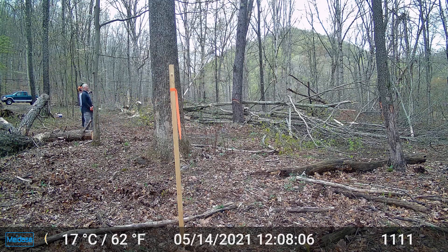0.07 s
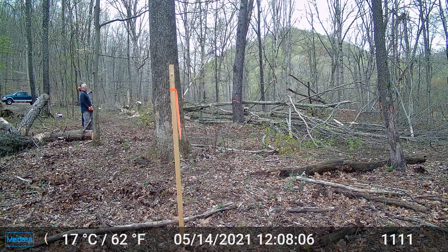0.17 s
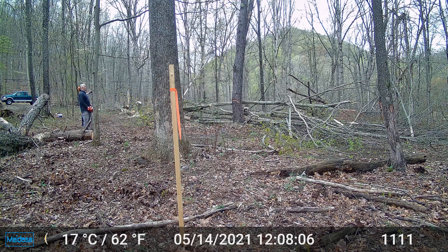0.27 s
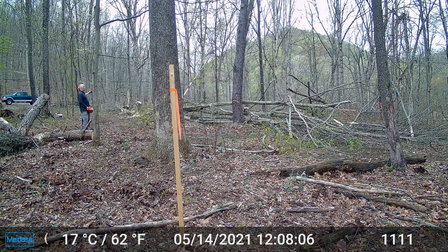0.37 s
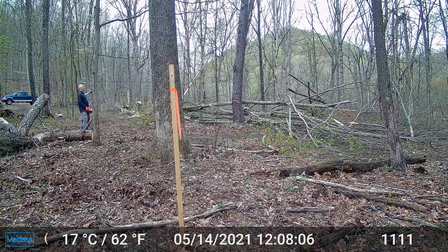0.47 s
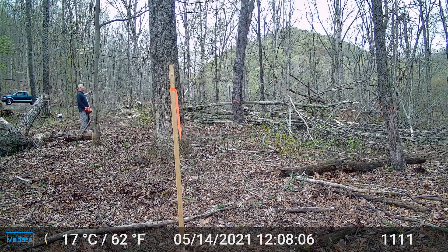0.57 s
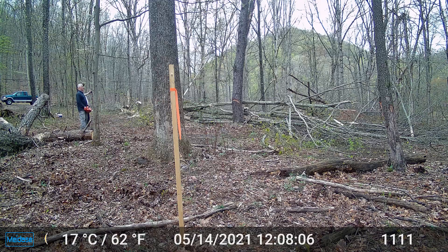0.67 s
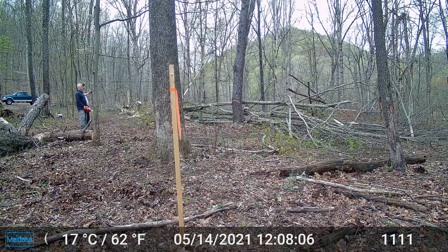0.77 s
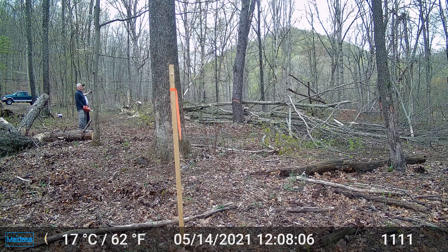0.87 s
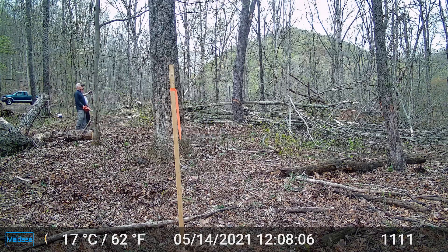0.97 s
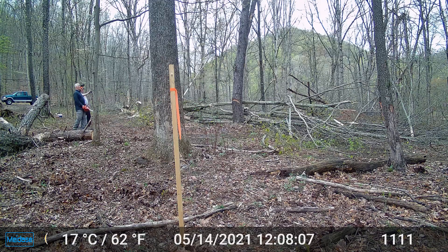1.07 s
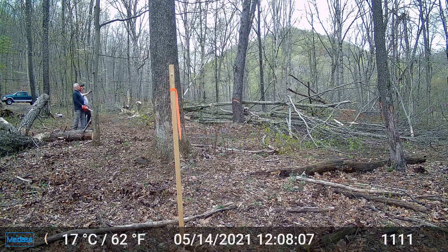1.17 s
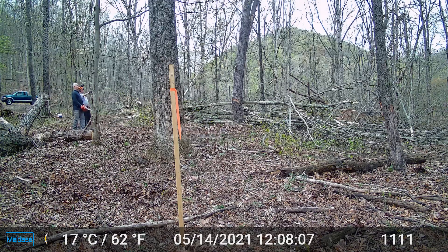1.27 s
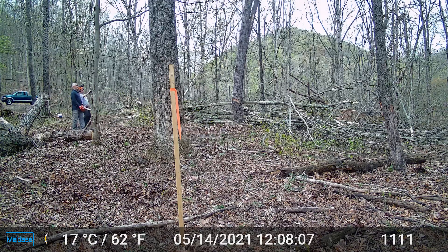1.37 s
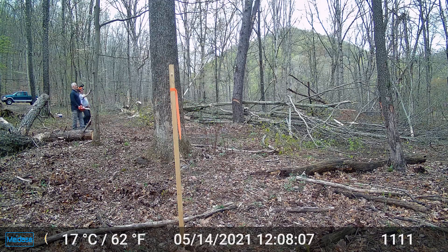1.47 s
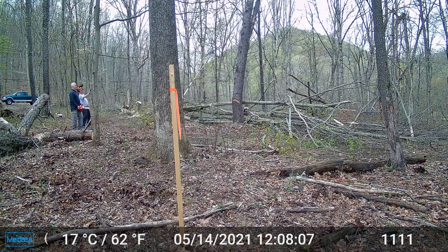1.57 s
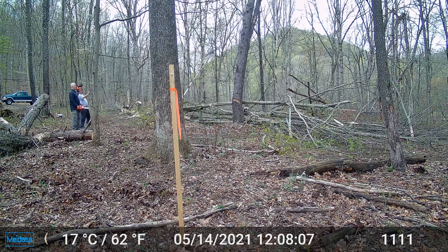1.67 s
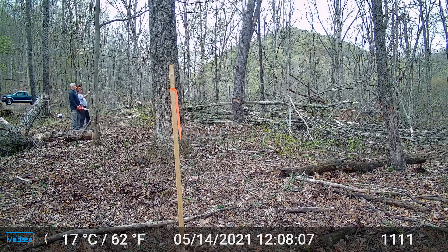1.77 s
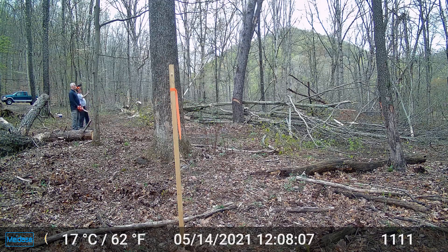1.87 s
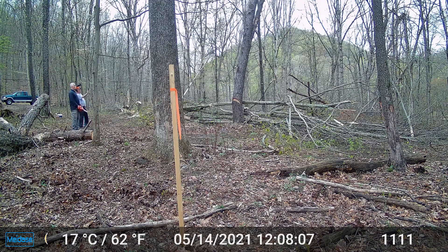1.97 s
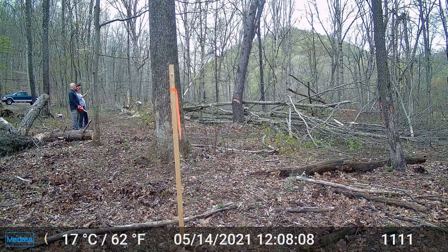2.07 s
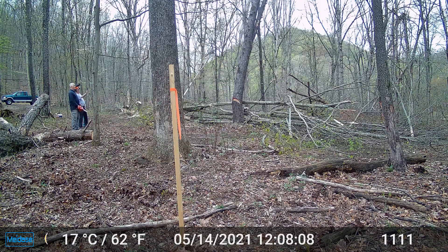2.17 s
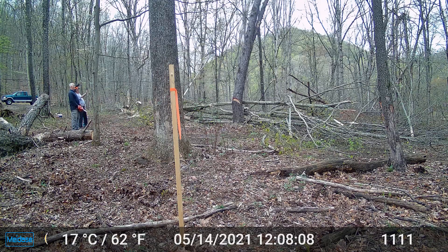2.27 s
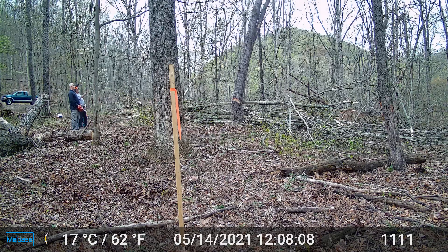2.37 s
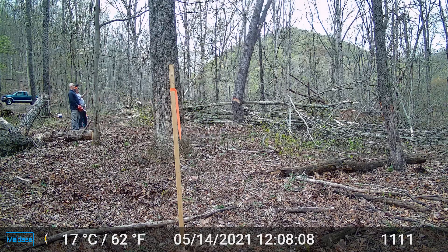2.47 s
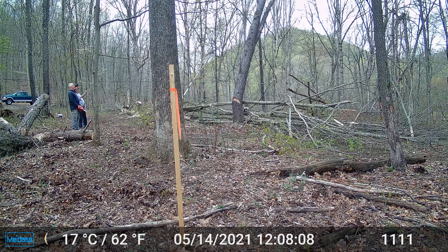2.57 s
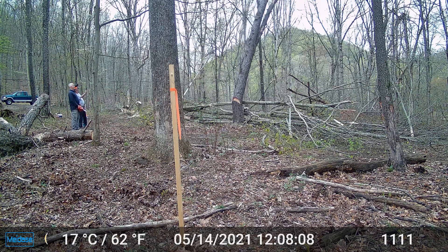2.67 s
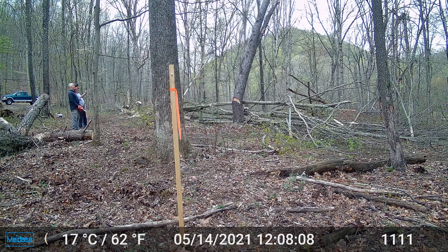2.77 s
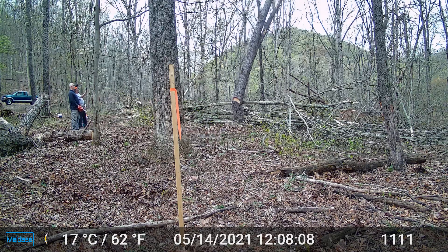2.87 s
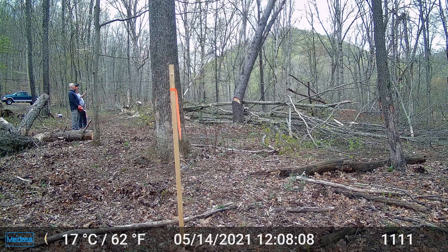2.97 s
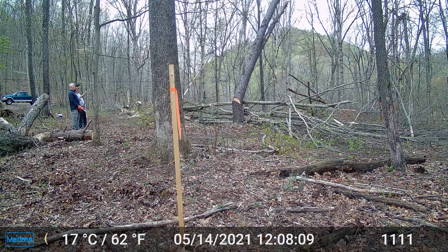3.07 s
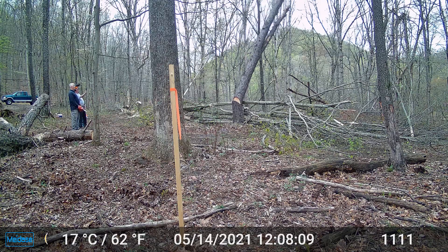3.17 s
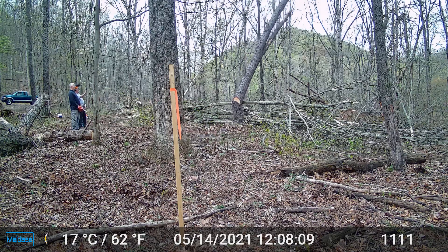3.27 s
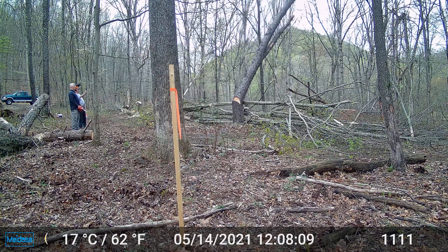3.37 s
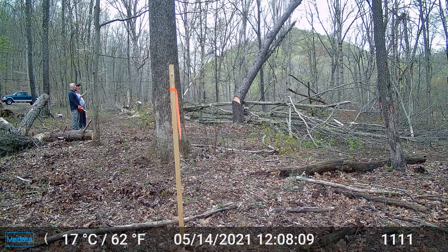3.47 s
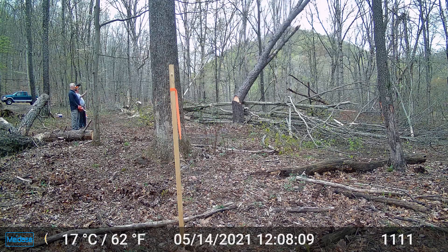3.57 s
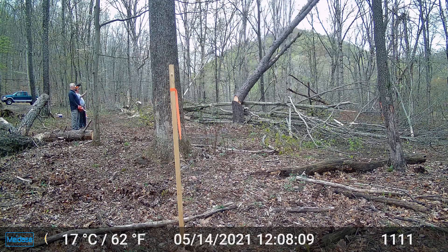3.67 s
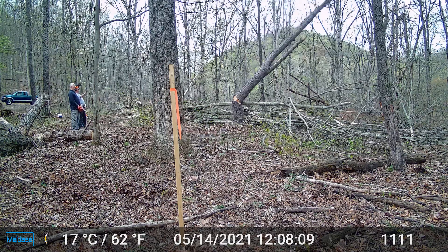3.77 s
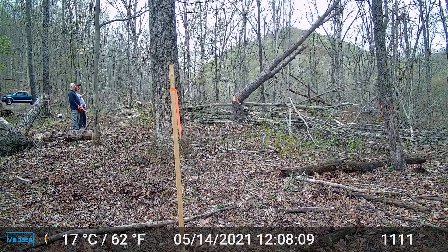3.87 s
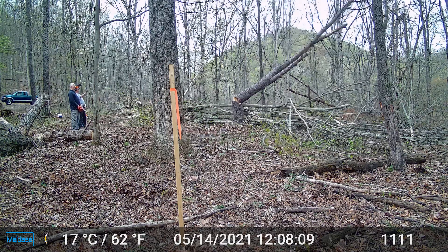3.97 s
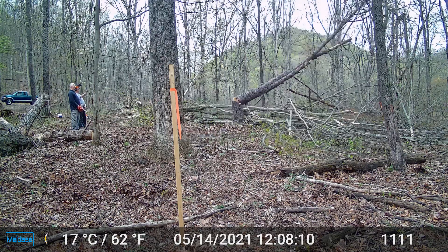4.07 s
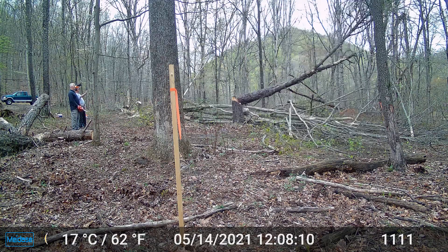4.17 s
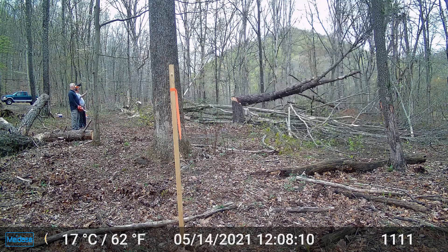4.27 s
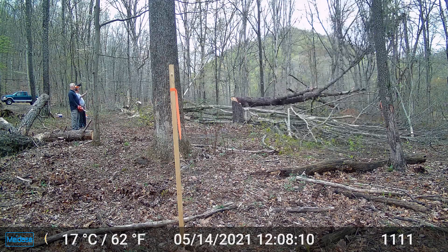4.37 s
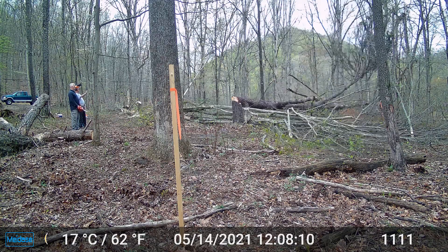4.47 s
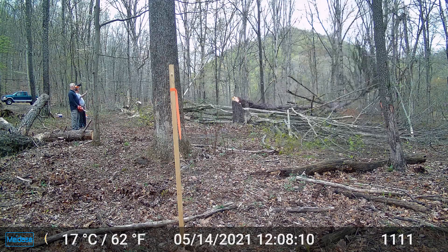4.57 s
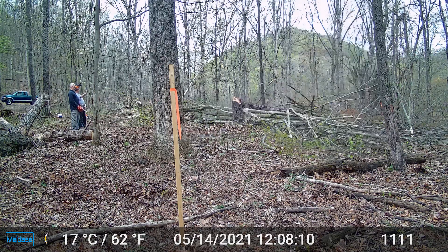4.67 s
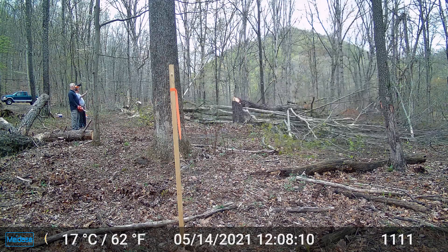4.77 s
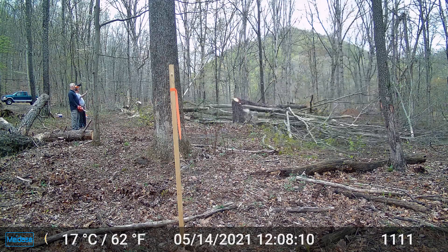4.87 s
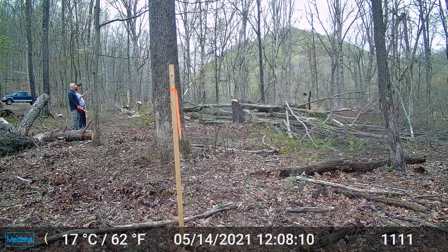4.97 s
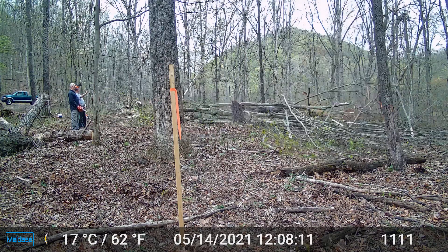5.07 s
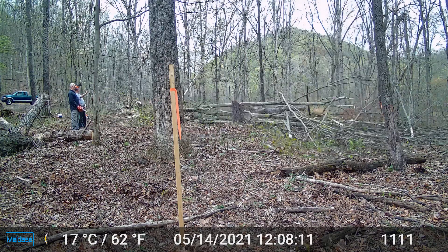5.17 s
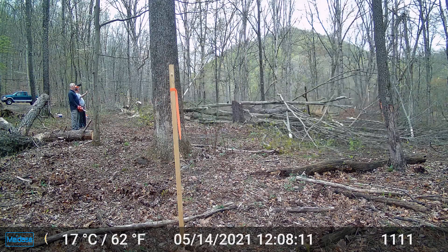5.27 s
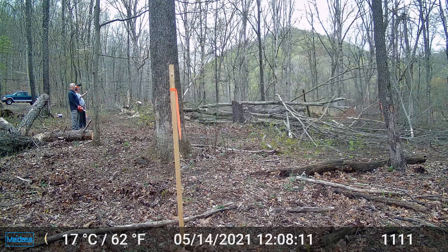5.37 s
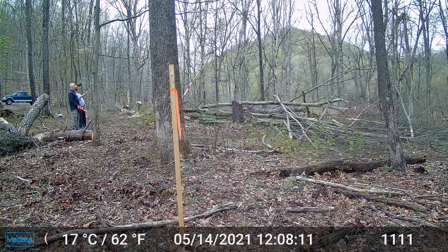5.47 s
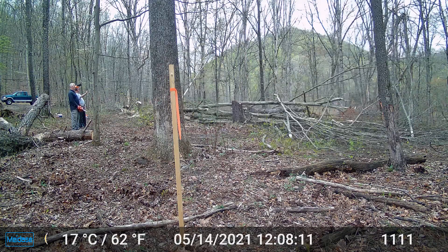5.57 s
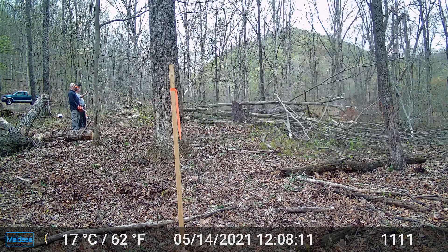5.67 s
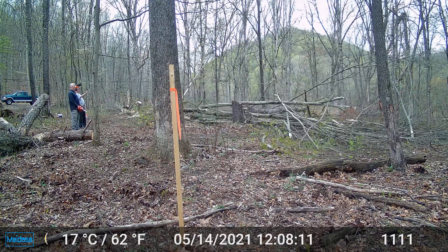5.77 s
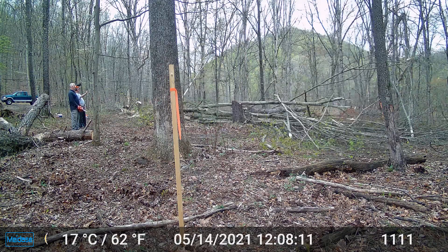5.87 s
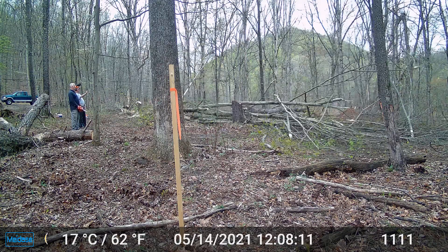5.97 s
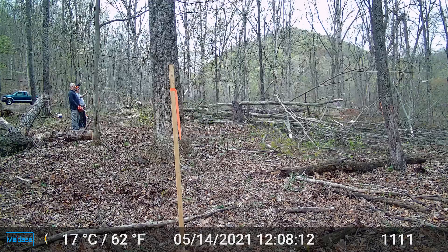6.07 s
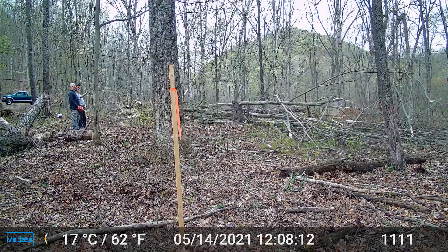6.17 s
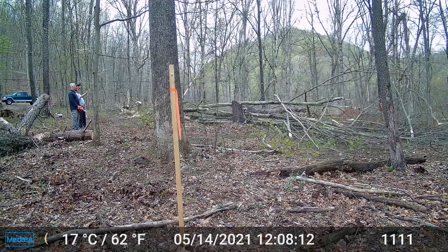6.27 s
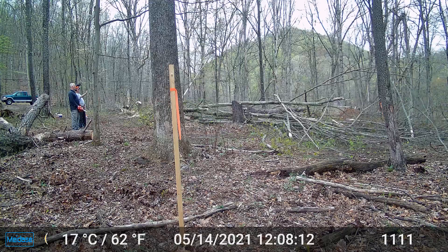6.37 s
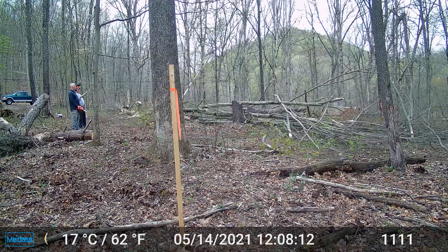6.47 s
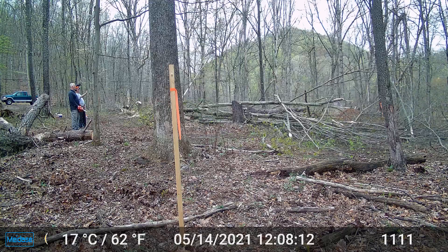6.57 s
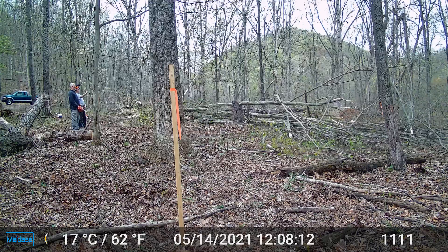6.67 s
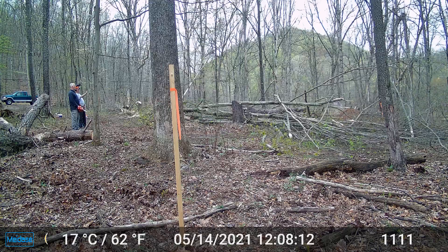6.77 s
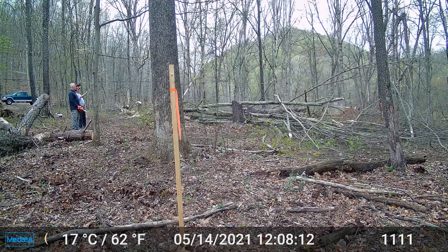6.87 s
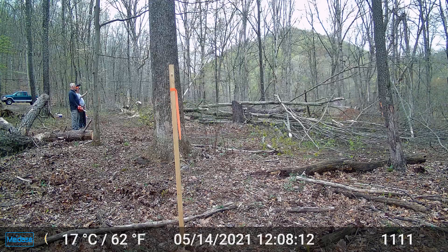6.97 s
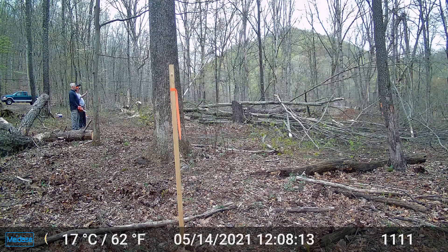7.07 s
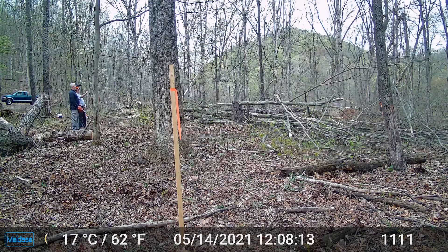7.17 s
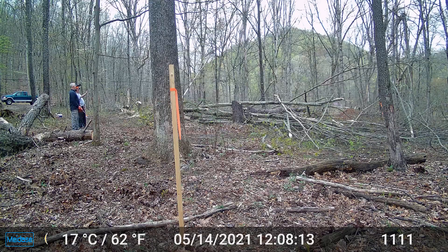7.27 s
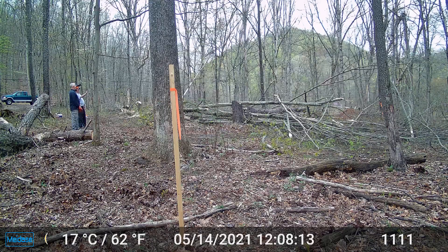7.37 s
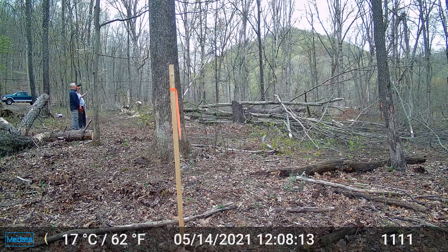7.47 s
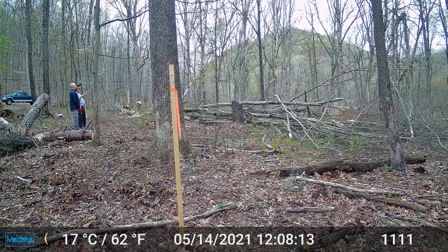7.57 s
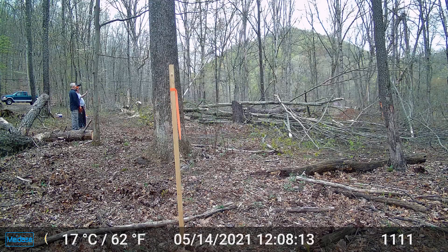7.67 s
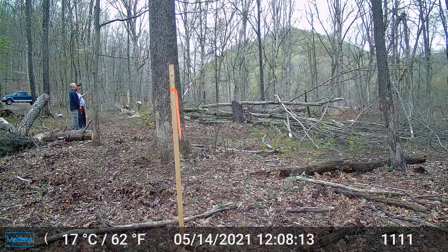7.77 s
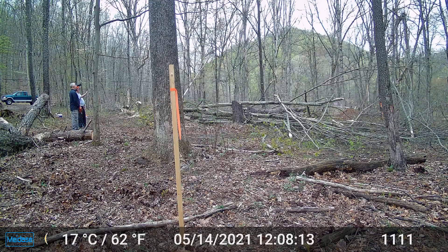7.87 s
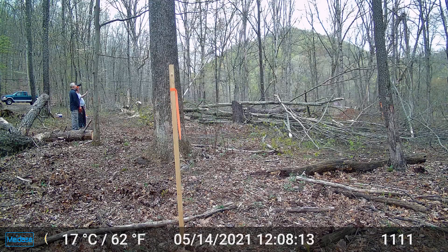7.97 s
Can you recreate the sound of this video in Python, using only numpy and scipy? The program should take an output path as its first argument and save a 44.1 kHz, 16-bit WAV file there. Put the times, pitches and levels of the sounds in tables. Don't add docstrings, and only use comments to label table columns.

```python
import sys
import numpy as np
from scipy import signal
from scipy.fft import rfft, irfft, next_fast_len
from scipy.io import wavfile
from scipy.ndimage import uniform_filter1d, map_coordinates

SR = 44100
rng = np.random.default_rng(int(sys.argv[2]) if len(sys.argv) > 2 else 0)


def magnitude_from_level(level_db):
    exponent = np.asarray(level_db, float) / 20
    return 10 ** exponent


def int16_out(signal):
    q = np.round(np.clip(np.atleast_2d(signal).T, -1, 1) * 32767)
    wavfile.write(sys.argv[1], SR, q.astype(np.int16))


N = 352932
PARTS_S, LANDS_S = 3.4, 4.8
RAKE_START_S, RAKE_END_S = 3.837, 4.6
KNOCK_CYCLES, KNOCK_DB = 0.66, 4.5


def unit(x):
    return x / np.sqrt(np.mean(x ** 2, axis=-1, keepdims=True) + 1e-20)


def peak(rows, db):
    return magnitude_from_level(db) * rows / np.abs(rows).max(1, keepdims=True)


def along(points, hz):
    f, v = np.transpose(points)
    return np.interp(np.log(hz + 1), np.log(f + 1), v)


def curves(rows):
    s, *columns = np.transpose(rows)
    t = np.arange(N) / SR
    return [np.interp(t, s, column, left=-120, right=-120) for column in columns]


def modes(rows, f):
    return sum((-1) ** k * magnitude_from_level(db) * 1j * f * width / (hz * hz - f * f + 1j * f * width)
               for k, (hz, width, db) in enumerate(rows))


def causal(gain):
    cepstrum = irfft(np.log(np.maximum(gain, 1e-6)))
    half = cepstrum.shape[-1] // 2
    cepstrum[..., 1:half] *= 2
    cepstrum[..., half + 1:] = 0
    return np.exp(rfft(cepstrum))


def filtered(x, response):
    size = next_fast_len(x.shape[-1] + 8192)
    return irfft(rfft(x, size) * response(np.fft.rfftfreq(size, 1 / SR)), size)[..., :x.shape[-1]]


def wobble(rate):
    knots = rng.standard_normal(int(N * rate / SR) + 4)
    return map_coordinates(knots, [np.arange(N) * rate / SR], order=2)


def crackle(spectrum, per_s, spread_db, life_ms, noise_share, count=5):
    sizes = magnitude_from_level(spread_db * np.minimum(rng.exponential(size=(count, N)), 3))
    starts = sizes * (rng.random((count, N)) < per_s / SR)
    grains = unit(signal.lfilter([1], [1, -np.exp(-1000 / (SR * life_ms))], starts))
    bed = np.clip(noise_share, 0, 1)
    patches = magnitude_from_level(2.4 * np.array([wobble(24) for _ in range(count)]))
    mix = patches * np.sqrt((1 - bed) * grains ** 2 + bed) * rng.standard_normal((count, N))
    centres = np.geomspace(250, 7500, count)[:, None]

    def pitch_ranges(f):
        return np.exp(-(np.log((f + 1) / centres) / (2.7 / (count - 1))) ** 2)

    return unit(filtered(mix, lambda f: magnitude_from_level(along(spectrum, f)) * pitch_ranges(f)).sum(0))


def placed(rows, seconds, count):
    at = np.round(seconds * SR).astype(int)[:, None] + np.arange(rows.shape[1])
    track = (np.arange(len(rows)) % count)[:, None] * 2 * N
    return np.bincount((at + track).ravel(), rows.ravel(), count * 2 * N).reshape(count, -1)[:, :N]


def floor_path(x):
    share = 0.6
    return (x + share * np.roll(x, round(0.0006 * SR), -1)) / np.hypot(1, share)


def knock(hz, t, cycles):
    u = t * hz / cycles
    blow = np.sin(2 * np.pi * hz * t) * u ** 2 * np.exp(-u)
    return blow + magnitude_from_level(-6.5) * np.roll(blow, round(0.002548 * SR), 1)


# frequency in Hz, t60 in seconds.
WOODS_DECAY = [(80, 0.75), (300, 0.79), (1000, 0.86), (2800, 0.5), (4500, 0.65), (8000, 0.45)]


def woods(tracks):
    hz, t, z = signal.stft(rng.standard_normal((len(tracks), SR)), SR, nperseg=256)
    lumps = uniform_filter1d(rng.standard_normal(z.shape), size=24, axis=1) * np.sqrt(24)
    decay = magnitude_from_level(-60 * t / along(WOODS_DECAY, hz)[:, None])
    tail = signal.istft(z * magnitude_from_level(3.4 * lumps) * decay, SR, nperseg=256)[1][:, :SR]
    t = np.arange(SR) / SR
    tail = tail * (1 - np.exp(-t / 0.00095)) * (1 + 1.2 * np.exp(-t / 0.03))
    tail = tail / np.linalg.norm(tail, axis=1, keepdims=True)
    return signal.fftconvolve(tracks, tail, axes=1)[:, :N].sum(0)


# frequency in Hz, level in dB per Hz.
HUSH_SPECTRUM = [(12, -42), (20, 3.5), (128, 6.5), (179, -0.5), (214, -12.5), (297, -2), (592, -5.5),
                 (824, -10.5), (1010, -8), (7360, -18.5), (8150, -27), (8800, -49), (11400, -65.5),
                 (19400, -120)]
# frequency in Hz, rms level in dB.
HUM_TONES = [(60, -64.5), (120, -65.5), (210, -68.5)]
# start in seconds, end in seconds, pitch in Hz, level in dB.
FIRST_CREAK = (.08, .17, 625, -52)


def background():
    t = np.arange(N) / SR
    hiss = unit(filtered(rng.standard_normal(N), lambda f: magnitude_from_level(along(HUSH_SPECTRUM, f))))
    hum = sum(np.sqrt(2) * magnitude_from_level(db + 1.6 * wobble(8.7)) * np.sin(2 * np.pi * hz * t) for hz, db in HUM_TONES)
    start, end, hz, db = FIRST_CREAK
    gate = np.sin(np.pi * np.clip((t - start) / (end - start), 0, 1))
    creak = unit(filtered(rng.standard_normal(N), lambda f: modes([(hz, 45, 0)], f) ** 2))
    hiss_db = -56 + 1.2 * wobble(1)
    return magnitude_from_level(hiss_db) * hiss + hum + magnitude_from_level(db) * gate * creak


# time in seconds, level in dB.
HINGE_LOAD = [
    (0.7, -49),
    (1.2, -56),
    (1.75, -50),
    (2.0, -55),
    (2.25, -44.5),
    (2.9, -49),
    (3.1, -54.5),
    (3.5, -24),
    (3.75, -57.5),
]


def straining():
    thin_fizz = [(1500, -27), (3000, -8), (6500, -6.5), (8500, -8)]  # Hz, dB per Hz
    fizz = crackle(thin_fizz, 54, 8.5, life_ms=2.3, noise_share=0.32, count=2)
    return magnitude_from_level(curves(HINGE_LOAD)[0]) * fizz


# time in seconds, force in dB.
CROWN_SMASH = [
    (4.56, -53.5),
    (4.62, -20.5),
    (4.7, -20.5),
    (4.76, -12.5),
    (4.82, -10.5),
    (4.858, -4),
    (4.9, -15.5),
    (4.99, -13.5),
    (5.04, -26),
]
# centre in seconds, level in dB, half length in seconds, treble share in dB.
LEAF_SHAKES = [
    (4.318, -41, 0.034, 16.5),
    (6.48, -52, 0.58, 9.5),
    (7.148, -44.5, 0.037, -8),
    (7.6, -60.5, 0.23, -19),
    (8, -50.5, 0.11, -3.5),
]


def shaking():
    t = np.arange(N) / SR
    rake = magnitude_from_level(-42.5 + 12.5 * (t - RAKE_START_S)) * (t > RAKE_START_S) * (t < RAKE_END_S)
    smash = magnitude_from_level(curves(CROWN_SMASH)[0])
    end_s, end_db = CROWN_SMASH[-1]
    settle = magnitude_from_level(end_db - 26 * (t - end_s)) * (t > end_s)
    twigs = rake + smash + settle
    leaves = magnitude_from_level(5) * rake + magnitude_from_level(1.5) * settle + np.minimum(smash, magnitude_from_level(-30.5))
    for s, db, half_s, treble_db in LEAF_SHAKES:
        shake = magnitude_from_level(db) * np.exp(-np.abs((t - s) / half_s) ** np.where(t < s, 2, 1))
        twigs = twigs + shake
        leaves = leaves + magnitude_from_level(treble_db) * shake
    return twigs, leaves


# frequency in Hz, level in dB per Hz.
TWIG_SPECTRUM = [(150, -43.5), (250, -4.5), (580, -6), (662, -6), (889, -8), (1050, -5.5), (1210, -4),
                 (1940, -4), (6050, -16.5), (8500, -34), (11000, -62.5), (18700, -120)]


def crown():
    t = np.arange(N) / SR
    force, leaves = shaking()
    twigs = crackle(TWIG_SPECTRUM, 170, 4.4, life_ms=2.6, noise_share=0.5, count=4)
    leaf_spectrum = [(1500, -39), (3000, -5.5), (5000, -7.0), (8000, -13.5)]  # Hz, dB per Hz
    fizz = crackle(leaf_spectrum, 220, 5.4, life_ms=3.4, noise_share=0.3, count=3)
    dull = filtered(twigs, lambda f: 1 / (1 + (f / 950) ** 6))
    heavy = np.clip((20 * np.log10(force) + 42.5) / 30, 0.2, 1.1)
    rake_body = 0.98 * (t < 4.7)
    heavy = np.maximum(heavy, np.where(t > RAKE_END_S, 0.82, rake_body))
    twigs = twigs + (heavy - 1) * dull
    near = force * twigs + magnitude_from_level(-6.0) * leaves * fizz
    return near + magnitude_from_level(-10.5) * woods(near[None])


# start in
# seconds, peak level in dB, pitch in Hz, t60 in seconds.
LOW_THUDS = [(1.817, -17.5, 78, 0.17), (1.822, -20, 186, 0.17), (2.305, -18.5, 165, 0.12),
             (2.256, -29.5, 294, 0.12), (2.512, -11, 75.7, 0.11), (2.941, -7, 77, 0.22),
             (4.278, -23, 140, 0.03), (4.27, -29, 45.2, 0.4), (4.354, -31, 110, 0.097),
             (3.26, -7.5, 77.5, 0.21), (3.408, -10.5, 69, 0.24), (3.613, -3, 59.5, 0.096),
             (4.612, -15, 151, 0.048), (4.672, -19.5, 79.5, 0.069), (4.738, -4, 158.8, 0.28),
             (4.75, -7, 196.5, 0.14), (4.944, -12, 158, 0.14), (4.782, 0, 170.5, 0.29),
             (4.884, 2.5, 116, 0.24), (5.012, 2.5, 137, 0.057), (5.028, -5, 52.6, 0.35),
             (5.117, -1.5, 87.5, 0.052), (5.198, -19, 100, 0.097), (5.446, -13.5, 155, 0.029),
             (5.55, -11, 80, 0.046), (5.6, -28.5, 51, 0.59), (6.567, -17, 154, 0.034),
             (6.582, -19.5, 58, 0.14), (7.09, -20.5, 260, 0.038), (7.157, -23.5, 122, 0.042),
             (7.597, -31, 81, 0.1)]


def thuds():
    s, db, hz, t60 = np.array(LOW_THUDS).T[:, :, None]
    t = np.arange(SR // 2) / SR
    swing = np.sin(2 * np.pi * hz * t) * magnitude_from_level(-60 * t / t60) * (1 - np.exp(-t / 0.01)) ** 2
    return placed(peak(swing, db - 8.5), s[:, 0] - 0.003, count=1)[0]


# time in seconds, level in dB.
TRUNK_FORCE = [
    (4.0, -50),
    (4.58, -36.5),
    (4.63, -26.5),
    (4.72, -26.5),
    (4.75, -7),
    (4.85, -20),
    (5.04, -8.5),
    (5.16, -39),
    (6.1, -60.5),
]
# frequency in Hz, width in Hz, level in dB.
LOG_MODES = [(81.5, 40, -10.5), (116, 11, -3.5), (146, 26, -5.5), (191, 18, -6), (223.5, 45, -14.5)]


def impact():
    lumps = magnitude_from_level(1.4 * wobble(30)) * rng.standard_normal(N)
    ringing = filtered(lumps, lambda f: modes(LOG_MODES, f) / (1 + (f / 350) ** 4))
    near = magnitude_from_level(curves(TRUNK_FORCE)[0]) * unit(ringing)
    return near + magnitude_from_level(-12.5) * woods(near[None])


# frequency in Hz, width in Hz, level in dB.
TICK_MODES = [(1550, 170, -1), (3300, 800, -4.5)]
# start in seconds, peak level in dB, ring pitch in Hz. Single hinge
HINGE_TICKS = [(0.185, -41, 1670), (0.402, -35.5, 3230), (0.455, -35.5, 4050), (0.558, -34.5, 4870),
               (0.691, -33, 3700), (0.85, -25, 6130), (0.892, -32, 6100), (1.088, -33, 6560),
               (2.146, -32, 1560), (2.893, -30.5, 1570), (2.549, -10, 4100), (2.573, -12, 4830),
               (2.909, -19, 6270),
               (0.247, -35.5, 2170), (0.381, -26.5, 3930), (0.444, -33, 4450), (0.545, -33, 3150),
                (0.941, -25.5, 2100), (1.0114, -26, 3200), (1.048, -27, 3070), (1.19, -16.5, 1880),
                (1.4434, -17.5, 5900), (1.49, -19.5, 3590), (1.505, -12, 1360), (1.6627, -23.5, 2985),
                (1.745, -22, 1680), (1.771, -23, 3160), (1.8875, -16.5, 1490), (1.9335, -11.5, 1460),
                (1.9537, -14.5, 1430), (1.934, -18, 3300), (1.955, -20, 3300), (2.06, -18, 1530),
                (2.0605, -26, 3200), (2.0667, -6.5, 1320), (2.107, -11.5, 1420), (2.118, -23.5, 1560),
                (2.1712, -16, 4270), (2.2342, -25.5, 1550), (2.2738, -16, 5150), (2.369, -19, 1240),
                (2.8053, -17.5, 1374), (3.07, -19.5, 5860), (3.0942, -4.5, 5600), (3.5695, -6.5, 6000),
                (3.582, -7.5, 3580), (3.67, -10.5, 2560), (3.627, -8, 2410), (3.646, -9, 975),
                (3.685, -17, 4250), (3.7, -14, 2880), (3.711, -23, 4440)]
TWIGS = [(4.0301, -19.5, 1650), (4.0675, -25, 3300), (4.17, -13, 6700), (4.2372, -16.5, 3180),
         (4.5446, -35, 3280), (4.9873, -8, 3480), (5.024, -7, 1740), (5.1307, -14, 1560),
         (5.2227, -21, 6400), (5.238, -21, 1430), (5.3806, -20, 1580), (5.591, -20, 2960),
         (5.658, -24.5, 5200), (5.9852, -30.5, 1910), (6.075, -27.5, 4630), (6.135, -29, 3320),
         (6.27, -25, 2530), (6.338, -28, 1680), (6.483, -29, 1980), (6.551, -26.5, 3400),
         (6.592, -31, 2660), (6.66, -31, 2370), (6.75, -32, 4250), (6.8366, -30.5, 2660),
         (7.5632, -35.5, 2400), (7.605, -36, 1970), (7.927, -39, 1500), (7.957, -42, 785),
         (7.977, -24.5, 5200)]
FURTHER_TICKS = [(0.211, -49, 1740), (0.407, -37, 3200), (0.431, -42, 2090), (0.669, -43, 3470),
                 (0.7575, -16.5, 3300), (0.7665, -26, 3500), (1.059, -38, 1710), (2.096, -37, 6840),
                 (2.157, -32, 1590), (2.195, -34.5, 1390), (2.209, -34, 6000), (2.225, -36, 1570),
                 (1.745, -20, 6050), (1.756, -24, 6960), (1.841, -7.5, 3340), (3.5287, -2.5, 5800),
                 (3.5508, -13, 3300), (3.513, -16.5, 5950), (3.119, -19.5, 6950), (3.237, -15.5, 6000),
                 (3.023, -26, 5200), (4.504, -22.5, 2640), (4.548, -23, 3000), (4.251, -22.5, 1700),
                 (1.455, -34, 6000), (7.147, -30, 1960), (7.182, -33, 2090), (7.165, -29, 3400),
                 (3.76, -25.5, 2520), (3.922, -43, 6870), (3.963, -25, 5300), (4.254, -21.5, 3100),
                 (4.266, -21.5, 1730), (4.305, -9.5, 4870), (4.31, -8.5, 2170), (4.324, -13, 2900),
                 (4.355, -10.5, 3520), (4.38, -21, 2940), (4.53, -27.5, 3300), (4.6, -25, 3300),
                 (4.619, -17, 1590), (4.653, -13.5, 6500), (4.661, -7, 1700), (4.749, -9, 1995),
                 (7.113, -23, 5450), (7.132, -31, 1600), (7.19, -41.5, 1200), (7.237, -44, 1240),
                 (7.252, -41, 2050), (7.309, -42.5, 2140)]
LANDING_LIMBS = [(4.811, -2, 1060), (4.83, -3.5, 735), (4.838, -8, 1620), (4.848, -2.5, 1964),
                 (4.857, -5, 1366), (4.868, -1, 2340), (4.884, -2.5, 2430), (4.92, -8.5, 1603),
                 (4.957, -17, 1480), (4.971, -6.5, 1710), (4.998, -4.5, 1723), (5.099, -8.5, 2520),
                 (5.3245, -37, 1550)]
BARK_PATTER = [(5.4197, -24, 1770), (5.552, -25, 3200), (5.576, -30, 6500), (5.6153, -28, 2430),
               (5.701, -35, 6460), (5.7889, -37, 2540), (5.8652, -34, 3300), (5.8922, -33, 1430),
               (6.258, -38, 4680), (6.3067, -37, 4500), (6.4549, -36, 2390), (6.558, -34, 3070),
               (6.599, -30, 4500), (6.627, -34, 1910), (6.762, -36, 2630), (6.8156, -38, 2140),
               (7.58, -44, 2190), (7.62, -44, 1700), (7.205, -38, 1310), (7.22, -42, 2100),
               (7.275, -44, 1300)]


def ticks():
    pieces = HINGE_TICKS + TWIGS + FURTHER_TICKS + LANDING_LIMBS + BARK_PATTER
    s, db, hz = np.array(pieces).T[:, :, None]
    fallen, low = s > LANDS_S, hz < 3000
    t, f = np.arange(2048) / SR, np.fft.rfftfreq(2048, 1 / SR)
    decay = magnitude_from_level(-60 * t / 0.0066) + 0.22 * magnitude_from_level(-60 * t / 0.067)
    burst = rng.standard_normal((len(s), len(t))) * decay * (1 - np.exp(-t / 0.0008))
    overtone_db = -7 - 1.5 * np.log2(hz / 2000) + fallen
    lean = (1j * f / (0.29 * hz + 1j * f)) ** 2
    body = modes([(hz, 0.14 * hz, 0), (2.3 * hz, 0.26 * hz, overtone_db)], f)
    body = body + modes(TICK_MODES, f) * np.where(fallen, 0.3, 0.7)
    rattle_db = -6 * (~fallen & (s < LANDS_S) & low) - 2 * fallen - 3.5
    rattle = peak(irfft(rfft(burst) * body * lean), rattle_db)
    cycles = np.where(low, np.where(fallen, 1.2, 0.85), KNOCK_CYCLES)
    blow = peak(knock(hz, t, cycles), KNOCK_DB - 5.5)
    click = peak(floor_path(rattle) + blow, db)
    echoed = peak(rattle + 0.3 * peak(click, 0), db - 3.5)
    near = placed(click, s[:, 0] - 0.0005, count=1)[0]
    return near + magnitude_from_level(-12) * woods(placed(echoed, s[:, 0], count=2))


# start in seconds, peak level in dB, ring
# pitch in Hz, depth in dB (how much of the break reaches trunk and woods), extra trunk boom in dB.
DEEP_CRACKS = [(0.744, 0.5, 3630, -31.5, 2), (0.771, -3.5, 1324, -22, 3), (0.785, -1, 1300, -21.5, 2.5),
               (1.114, 0.5, 1203, -12, 1.6), (1.226, 0, 1510, -1.7, -0.6), (1.698, -3, 1347, -20, 2.5),
               (1.811, 2.5, 2127, -15, 1.5), (2.297, 2, 1580, -15.5, 4.5), (2.393, -0.5, 1204, -21.5, 6),
               (2.419, -4.5, 2840, -12.5, -6), (2.439, -2, 1620, -21, 2.5), (2.507, 3, 1417, -8, 1.3),
               (2.599, 0, 1235, -6.5, 0), (2.776, -6.5, 1960, -12, -4), (2.824, -3.5, 2200, -15, 4.2),
               (2.937, 2.5, 1233, -2, -8), (3.082, 3, 1229, -9.5, -1.1), (3.125, -3.5, 3980, -28, 9.5),
               (3.208, 1.5, 1470, -9.5, -6), (3.257, 2, 1417, -6.5, 6), (3.346, -2.5, 2240, -4.5, -9),
               (3.387, 1.5, 1260, -11, 3), (3.408, 2, 1125, -8, 0), (3.438, -3.5, 1260, -15.5, -13.5),
               (3.525, -10.5, 1380, -14.5, 14), (3.555, 1.5, 1120, -13.5, -1.5), (3.605, 3, 906, -9.5, 2.5),
               (7.093, -15, 1920, -14, -2), (7.15, -23.5, 1900, -7.5, -7)]
# frequency in Hz, level in dB per Hz.
SPLINTER_SPECTRUM = [(100, -17.5), (300, -20), (800, -5), (1350, -6.5), (3500, -4.5), (6800, -6.5),
                     (9000, -23)]
# frequency in Hz, width in Hz, level in dB.
TRUNK_MODES = [(800, 260, 2), (1200, 380, 6), (1620, 380, 4), (3300, 700, -2)]


def tearing():
    s, db, _, depth_db, _ = np.transpose(DEEP_CRACKS)
    u = np.arange(SR) / SR / 0.13
    swell = magnitude_from_level(2 * (db + depth_db - 26))[:, None] * (u * np.exp(1 - u)) ** 4
    holding = 1 / (1 + np.exp(np.clip((np.arange(N) / SR - PARTS_S) / 0.016, -50, 50)))
    splinters = crackle(SPLINTER_SPECTRUM, 130, 2.4, life_ms=1.7, noise_share=0.25)
    splinters = filtered(splinters, lambda f: (1 + 0.59 * modes(TRUNK_MODES, f)) / (1 + (f / 3580) ** 4))
    return holding * np.sqrt(placed(swell, s, count=1)[0]) * unit(splinters)


# start in seconds, peak level in dB,
# ring pitch in Hz.
SHALLOW_SNAPS = [(0.3117, -15, 1710), (0.33, -19, 2530), (0.588, -23.5, 1370), (0.611, -22, 3070),
                 (0.722, -12, 1260), (1.173, -11.5, 1760), (1.563, -8, 2140), (1.604, -15, 2000),
                 (2.861, -10.5, 2160), (3.5008, -6, 3330), (4.094, -8.5, 3900), (4.248, -23.5, 1770),
                 (4.283, -6.5, 2120), (4.298, -2, 1880), (4.316, -1.5, 1540), (4.346, -7.5, 3510),
                 (4.446, -7.5, 1660), (4.459, -5.5, 3340), (4.479, -9, 2920), (4.583, -11.5, 3180),
                 (4.609, -9.5, 2110), (4.631, -8, 2800), (4.672, -4, 3000), (4.677, -3.5, 1040),
                 (4.712, -13.5, 1940), (4.728, -12, 2480), (5.089, -8.5, 2550)]


def breaks():
    shallow = [row + (-21.5, -13) for row in SHALLOW_SNAPS]
    s, db, hz, depth_db, extra_db = np.transpose(DEEP_CRACKS + shallow)
    deep = np.arange(len(s)) < len(DEEP_CRACKS)
    boom_db = 0.99 * depth_db + 0.5 + extra_db
    burst_ms = np.where(deep, 33.4 + 0.33 * depth_db, 45)
    cut_hz = np.where(deep, 1, 0.51 * hz)
    true_db = db + 0.75 * np.maximum(db, 0)
    return np.array([s, true_db, hz, boom_db, depth_db, burst_ms, cut_hz])[:, :, None]


# frequency in Hz, level in dB per Hz.
CRACK_SPECTRUM = [(200, -50.5), (400, -13.5), (1100, -7.5), (2800, -1), (4800, -2.5), (7200, -8.5),
                  (9000, -39.5)]
# frequency in Hz, width in Hz, level in dB.
BOOM_MODES = [(126.3, 129, -8), (250, 23, -5), (426, 250, -9)]


def snaps():
    s, db, hz, boom_db, echo_db, burst_ms, cut_hz = breaks()
    t, f = np.arange(8192) / SR, np.fft.rfftfreq(8192, 1 / SR)
    chance = rng.standard_normal((len(s), 2, len(t)))
    run = t / np.clip(burst_ms / 1000, 0.003, 0.08)
    burst = chance[:, 0] * (magnitude_from_level(-200 * run ** 2) + 0.5 * magnitude_from_level(-45 * run)) * (1 - np.exp(-t / 0.001))
    lean = (1j * f / (cut_hz + 1j * f)) ** 3
    broad = causal(magnitude_from_level(along(CRACK_SPECTRUM, f)))
    trunk = modes(TRUNK_MODES, f * np.exp(0.12 * chance[:, 1, :1]))
    colour = broad * (0.24 + modes([(hz, hz, 7)], f)) + 0.96 * trunk
    rip = peak(irfft(rfft(burst) * lean * colour), 1.5 + 0.3 * echo_db)
    rip = np.where(cut_hz > 1, floor_path(rip), rip)
    dull = irfft(rfft(rip) / (1 + 1j * f / 3000) ** 2)
    rip = dull + (rip - dull) * np.exp(-t / 0.014)
    blow = peak(knock(hz, t, KNOCK_CYCLES), KNOCK_DB - 8)
    click = peak(irfft(lean * broad), -0.46)
    crack = peak(rip + blow + click, db + 0.5)
    lead_s = t[2048]
    lead = chance[:, 1, :2049] * np.exp((t[:2049] - lead_s) / 0.0022)
    lead = peak(lead, np.minimum(db, 0) - 13.5)
    push = chance[:, 1] * magnitude_from_level(-60 * t / 0.096) * (1 - np.exp(-t / 0.0014))
    boom = irfft(rfft(push) * modes(BOOM_MODES, f)) * np.clip((t[-1] - t) / 0.05, 0, 1)
    boom = peak(boom, db + boom_db - 0.5)
    hump = causal(magnitude_from_level(along(SPLINTER_SPECTRUM, f))) * (0.5 + modes([(hz, 1.6 * hz, 0)], f))
    top_hz = 5600 * np.exp(-0.17 * s * (s < PARTS_S))
    spread = irfft(lean * hump * causal(0.14 + 1 / (1 + (f / top_hz) ** 6)))
    strength = np.linalg.norm(crack, axis=1, keepdims=True) / np.linalg.norm(spread, axis=1, keepdims=True)
    near = crack + magnitude_from_level(-22.0) * np.roll(crack, round(0.02 * SR), 1) + boom
    far = magnitude_from_level(np.minimum(echo_db, -1.5) + 4.5) * (strength * spread + 0.5 * boom)
    direct = placed(near, s[:, 0] - 0.0003, count=1)[0] + placed(lead, s[:, 0] - lead_s, count=1)[0]
    return direct + woods(placed(far, s[:, 0], count=5))


def scene():
    ground = thuds() + impact()
    hinge = straining() + ticks() + tearing() + snaps()
    return (background() + crown() + ground + hinge)[None]


def low_pass(x):
    return signal.sosfilt(signal.butter(12, 16960, fs=SR, output="sos"), x)


def record(dry):
    x = filtered(dry, lambda f: 1 / (1 + (f / 8200) ** 40) / (1 + (22 / (f + 1)) ** 3))
    x = x / (1 + np.abs(x / 0.7) ** 10) ** (1 / 10)
    x = filtered(x, lambda f: (1 - 0.3 / (1 + (9000 / (f + 1)) ** 30)) / (1 + (f / 15700) ** 40))
    return low_pass(x)


dry = scene()
out = record(dry)
int16_out(out)
```